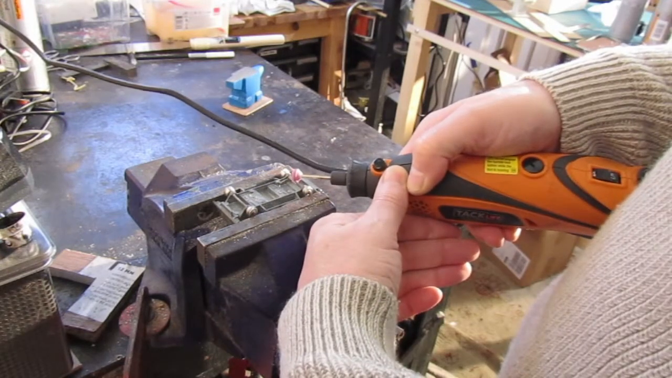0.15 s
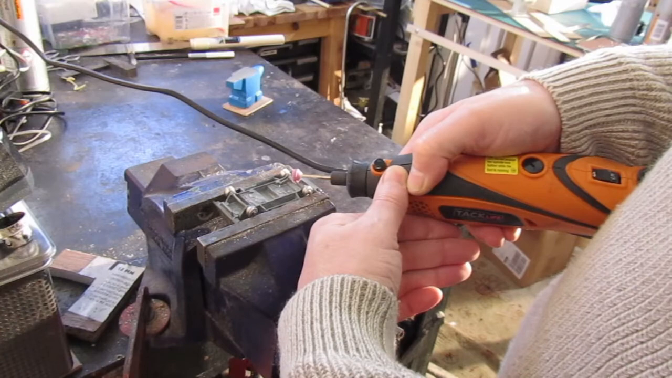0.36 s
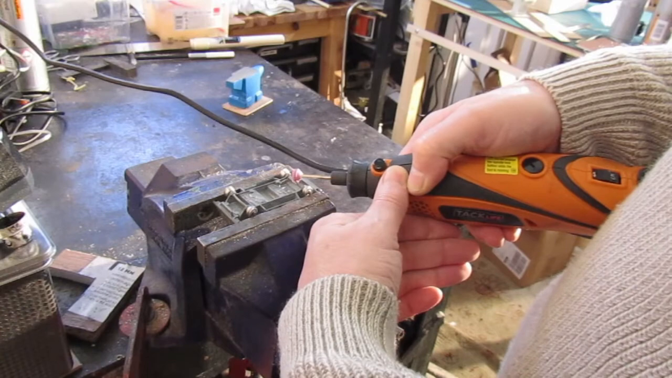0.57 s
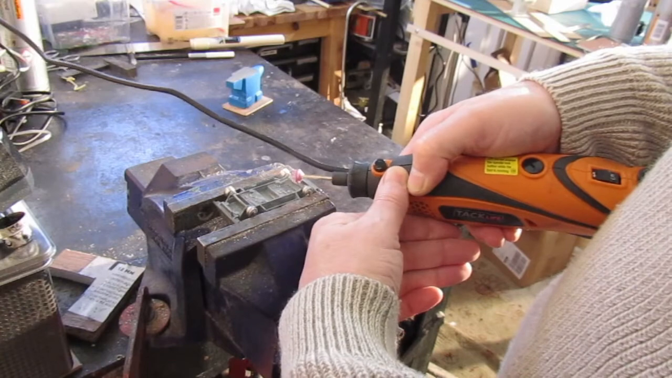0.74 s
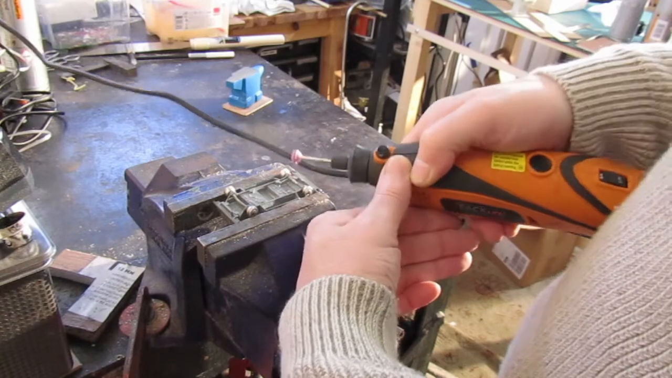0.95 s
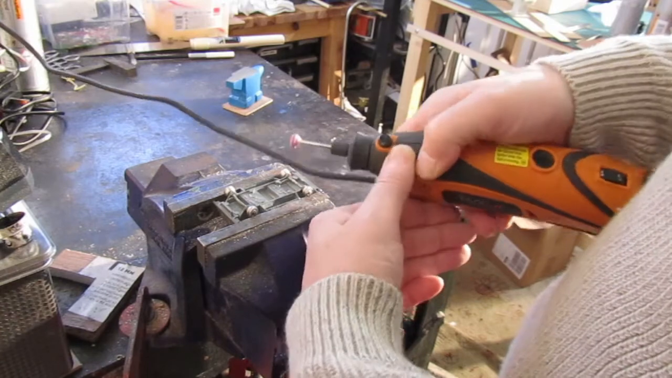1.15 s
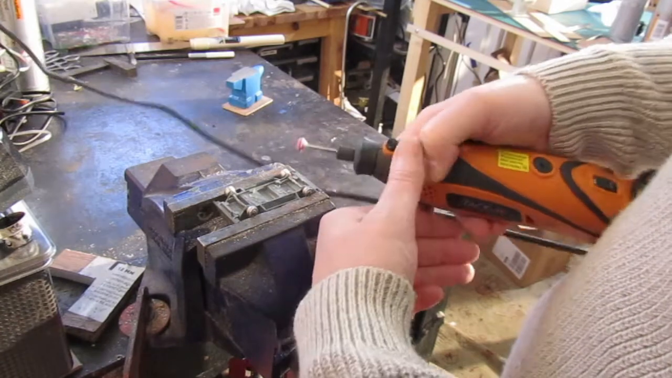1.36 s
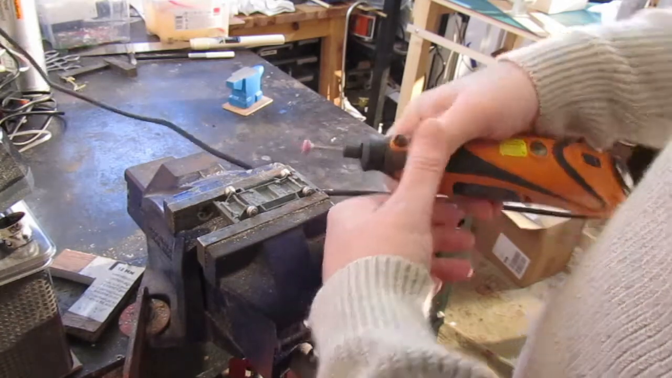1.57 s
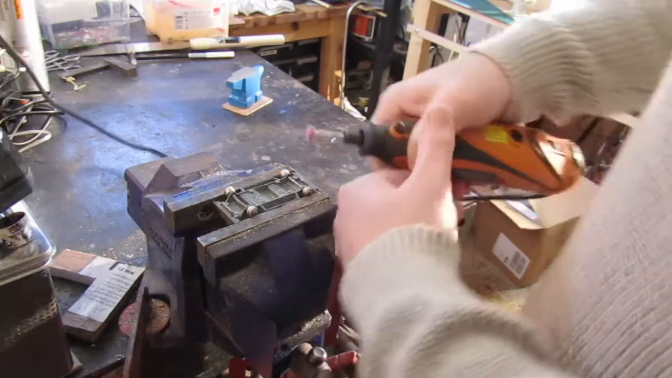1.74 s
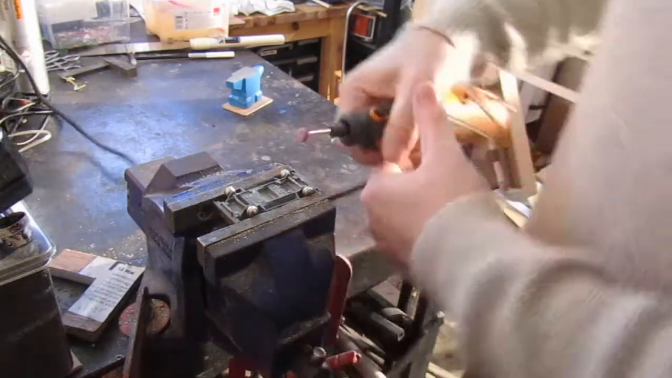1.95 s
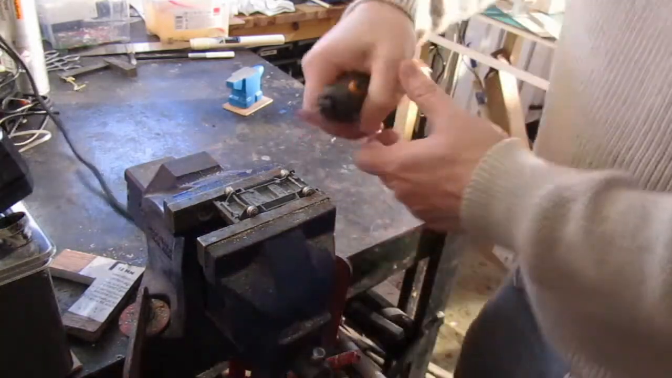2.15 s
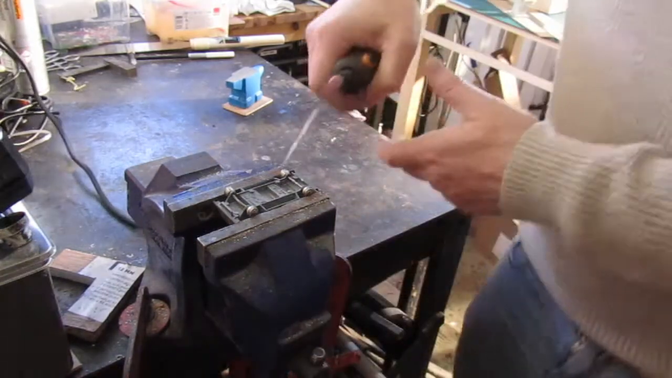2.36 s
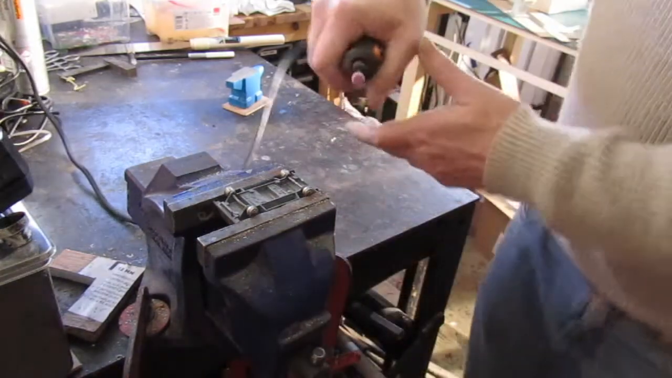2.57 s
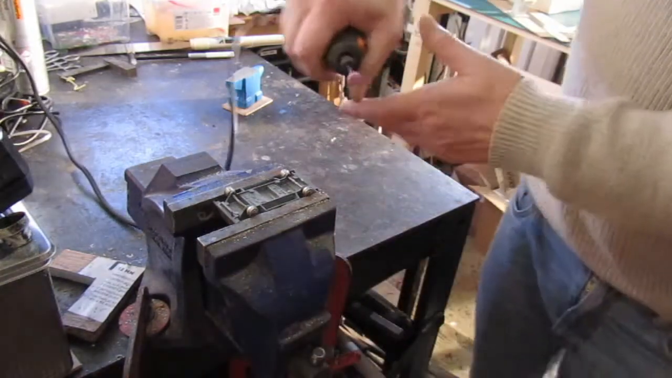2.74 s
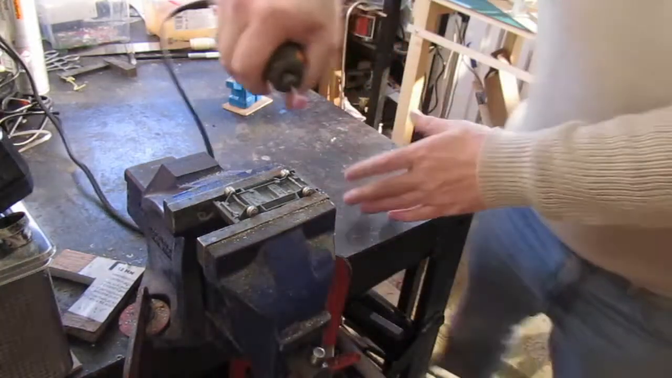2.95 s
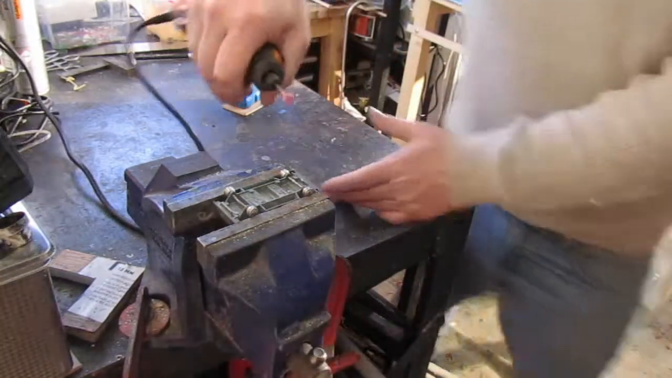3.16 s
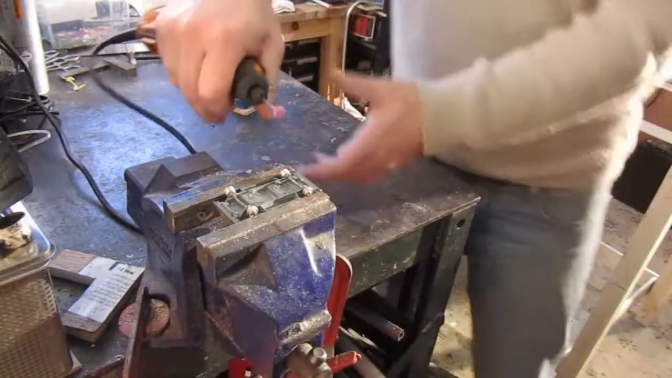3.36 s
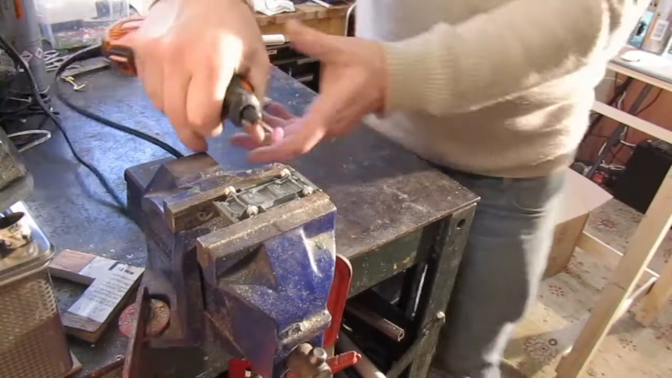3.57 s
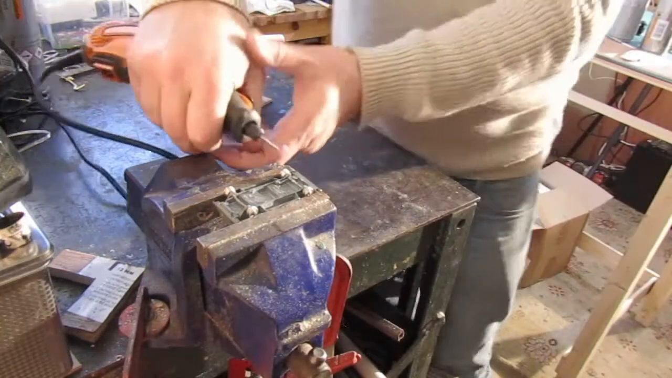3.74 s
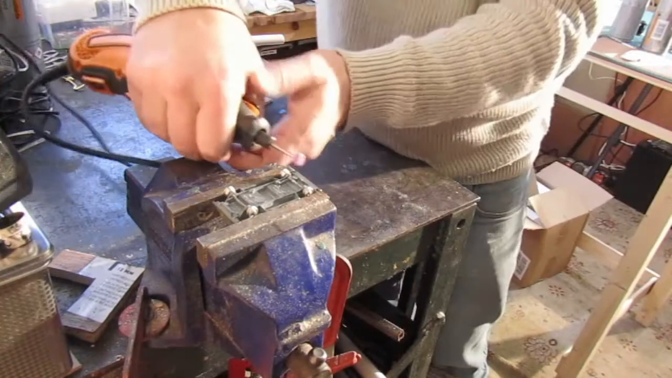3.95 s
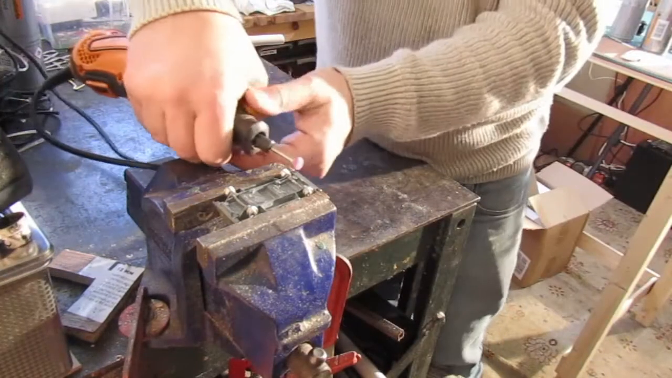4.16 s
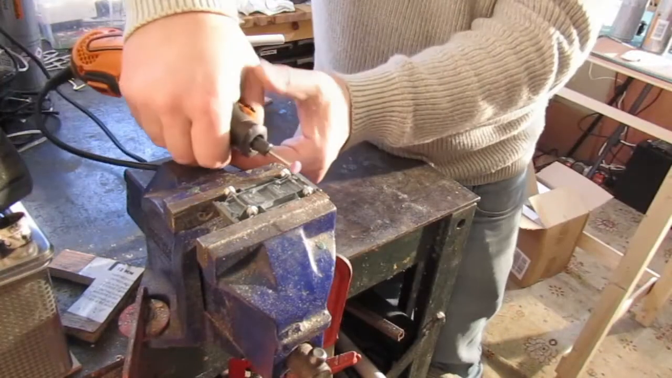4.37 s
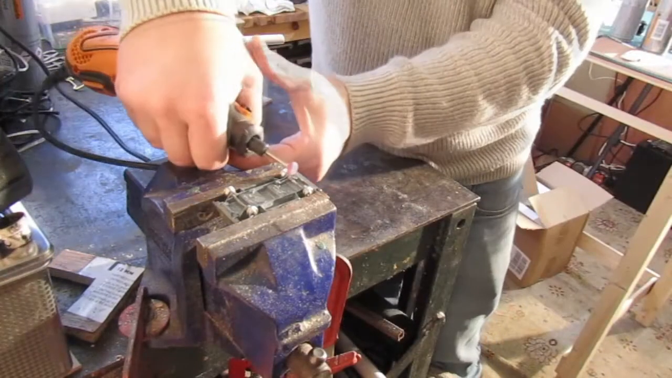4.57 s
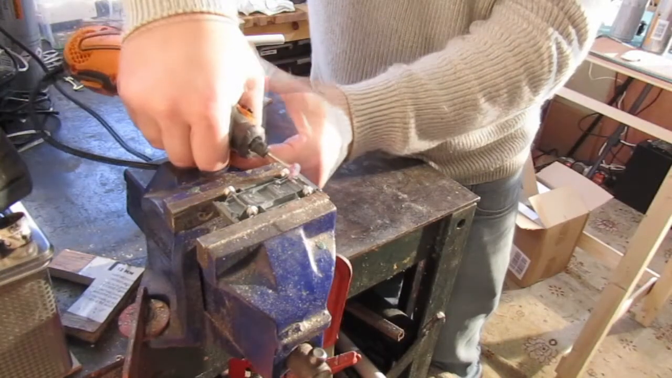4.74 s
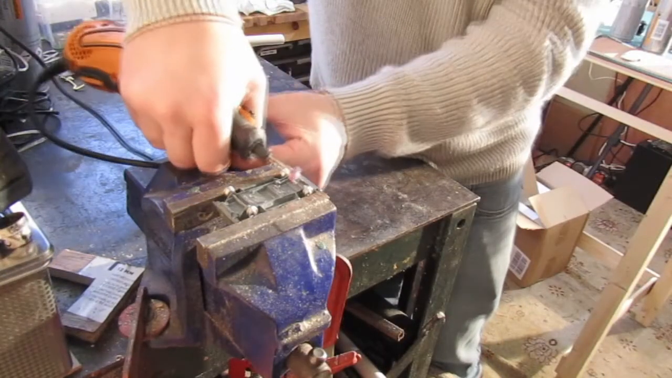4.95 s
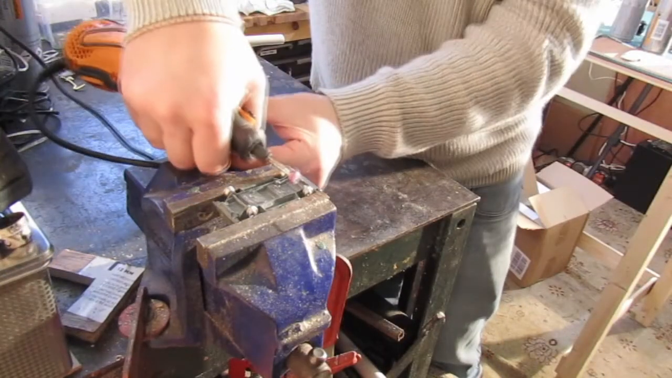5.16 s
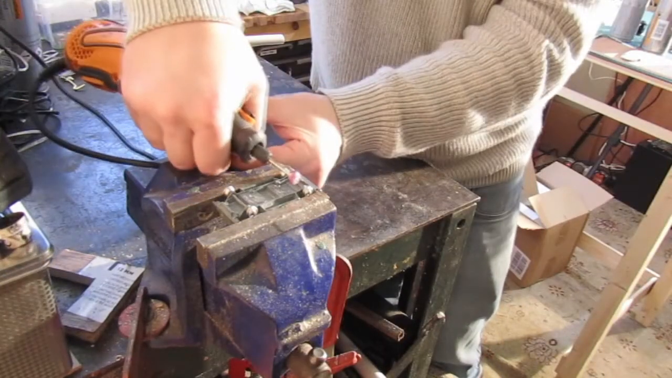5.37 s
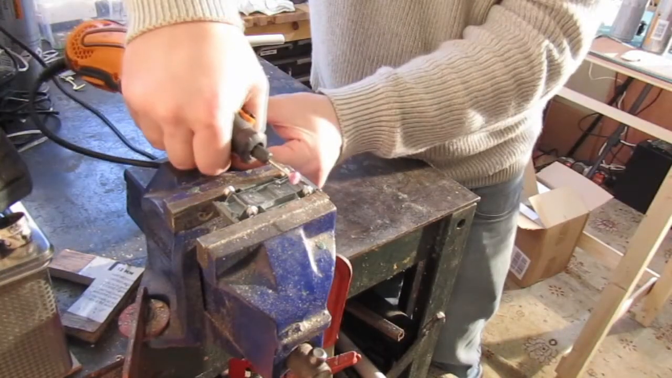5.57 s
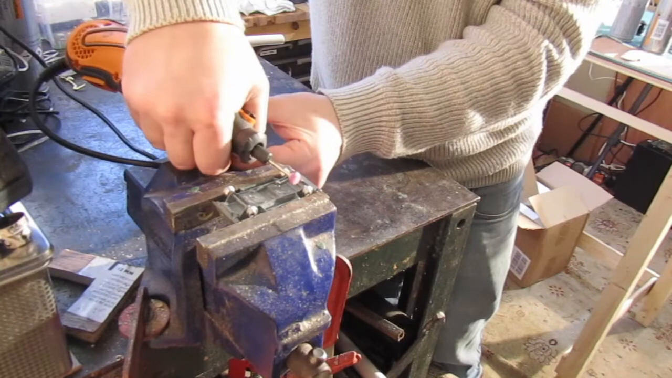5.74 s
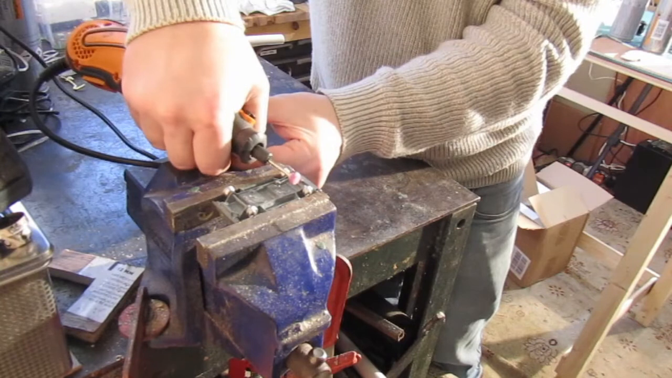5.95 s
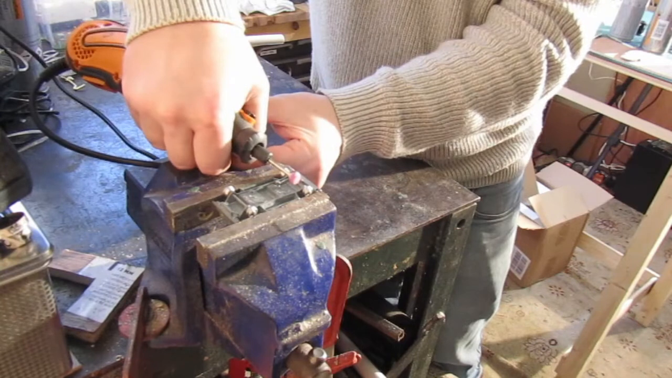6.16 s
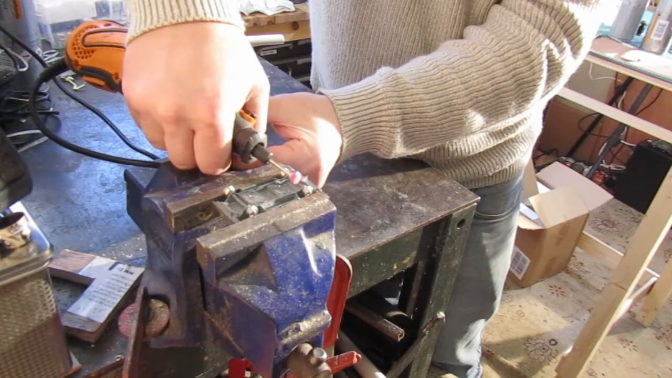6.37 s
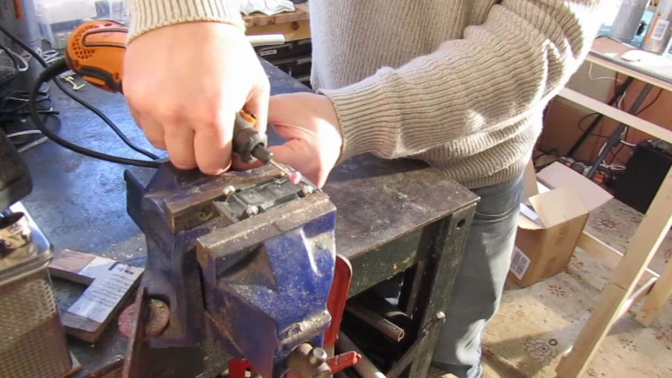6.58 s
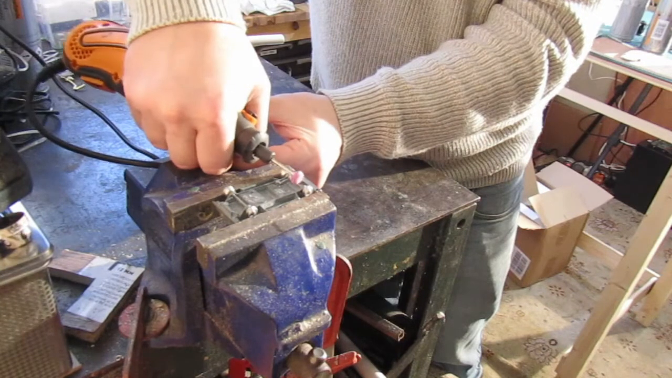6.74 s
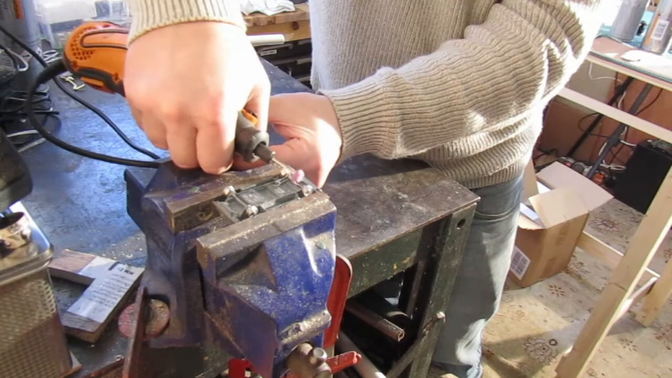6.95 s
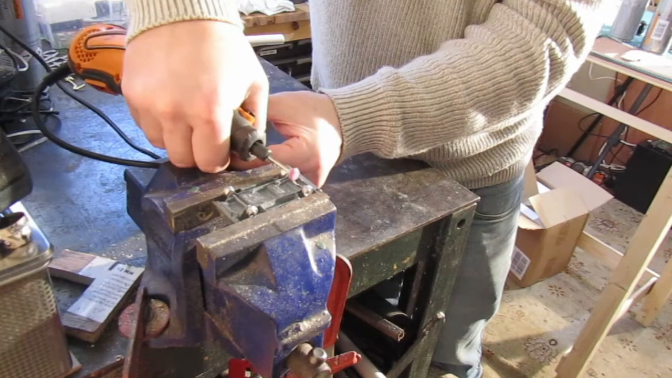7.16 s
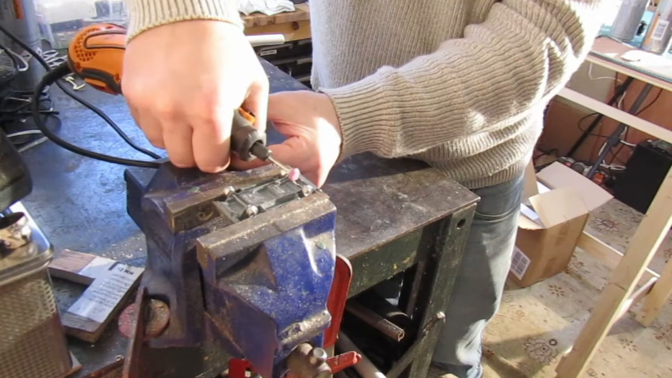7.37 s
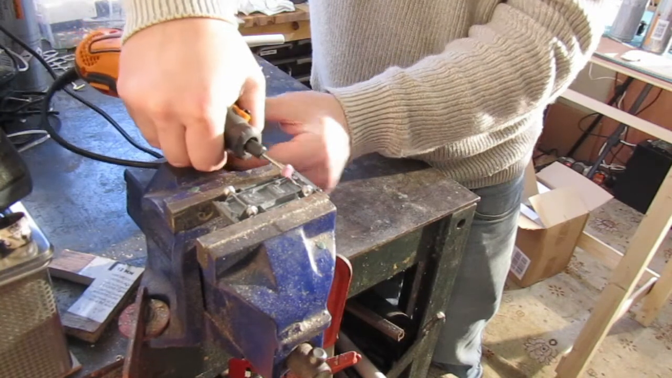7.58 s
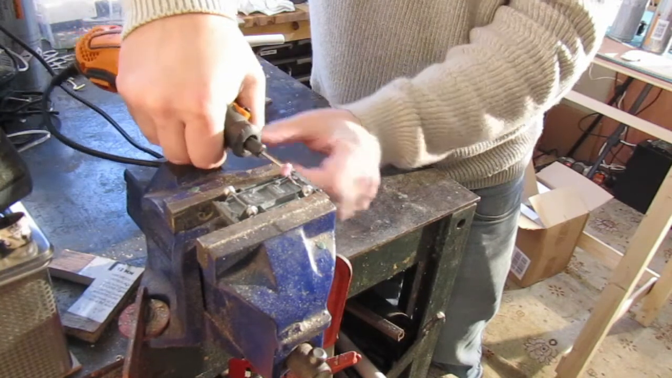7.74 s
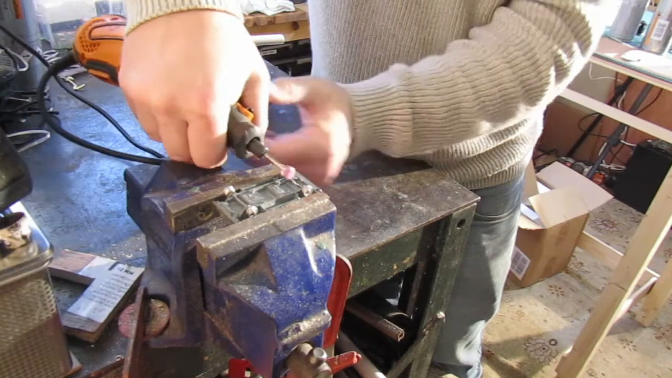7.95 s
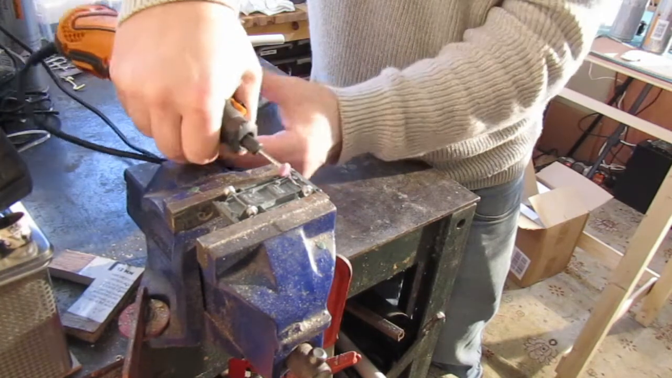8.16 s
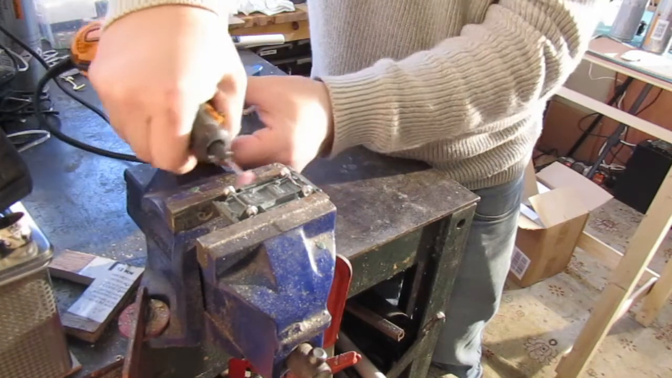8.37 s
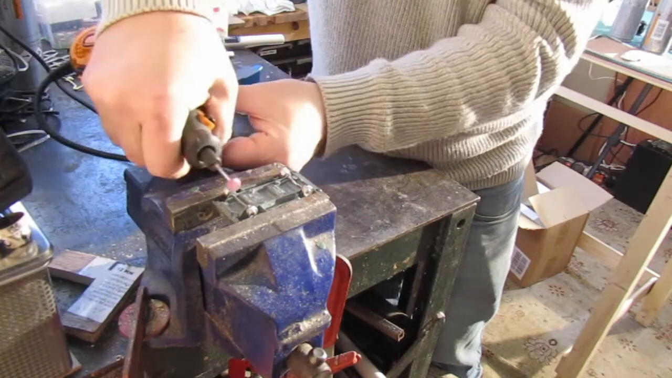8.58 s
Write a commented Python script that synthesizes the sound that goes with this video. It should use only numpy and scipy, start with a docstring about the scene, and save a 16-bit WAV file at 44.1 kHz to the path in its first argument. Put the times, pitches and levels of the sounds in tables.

```python
"""Rotary tool grinding a steel axle

Close up in a small workshop, a handheld tool whines. Its stone grinds an axle held in a vice, lifts off
so that the motor speeds up, and grinds again. Between the passes a shoe scuffs and something knocks
hollow wood. In the second pass the level dips briefly and the pitch jumps down. The left microphone
leads the right by a fraction of a millisecond."""
import sys
import numpy as np
from scipy import signal
from scipy.fft import rfft, irfft, next_fast_len
from scipy.io import wavfile
from scipy.ndimage import uniform_filter1d, map_coordinates

SR = 44100
rng = np.random.default_rng(int(sys.argv[2]) if len(sys.argv) > 2 else 0)


def file_out(sig):
    """Save sig as 16-bit WAV at sys.argv[1]."""
    # one column per channel
    cols = np.atleast_2d(sig).T
    # limit, then scale
    lim = np.clip(cols, -1, 1)
    pcm = np.round(lim * 32767).astype(np.int16)
    wavfile.write(sys.argv[1], SR, pcm)


N = 379701
TIME = np.arange(N) / SR
JUMP_S = 5.852  # the pitch drops and the level dips


def amp(db):
    return 10 ** (np.asarray(db) / 20)


def unit_rms(x):
    return x / np.sqrt(np.mean(x ** 2) + 1e-20)


def spectrum(points):
    """Gain against frequency through (f/Hz, level/dB) points on a log axis."""
    f, db = np.transpose(points)
    return lambda hz: amp(np.interp(np.log(hz + 1), np.log(f + 1), db))


def curves(rows):
    """One value per sample for each column after the time."""
    times, *columns = np.transpose(rows)
    return [np.interp(TIME, times, column) for column in columns]


def wobble(rate):
    """A smooth random curve, rate knots a second."""
    return map_coordinates(rng.standard_normal(int(N * rate / SR) + 4), [TIME * rate])


def filtered(x, response):
    """x through a complex frequency response."""
    size = next_fast_len(N + SR // 2)
    return irfft(rfft(x, size) * response(np.fft.rfftfreq(size, 1 / SR)), size)[..., :N]


def modes(table):
    """The response of (f/Hz, width/Hz, level/dB) resonances, alternating in sign."""
    return lambda f: sum((-1) ** k * amp(db) * 1j * f * width / (hz * hz - f * f + 1j * f * width)
                         for k, (hz, width, db) in enumerate(table))


def turning_noise(turns, depth_db, rough_db):
    """Noise that swells once a turn, each moment at a chance strength."""
    return rng.standard_normal(N) * amp(depth_db * np.cos(2 * np.pi * turns) + rough_db * wobble(300))


def shaft_speed(lag_s=.5, start_hz=319.6, after_jump_hz=339):
    """Turns a second: the rotor lags behind the speed that its load allows."""
    # allowed speed, low while the stone bites, high when it runs free: t/s, f/Hz
    allowed = [(0, 315), (.3, 310.8), (.5, 291.9), (.74, 255.5), (.81, 255.6), (.84, 426), (1.0, 428.6),
               (1.2, 405.7), (1.6, 414), (2.5, 421.3), (2.9, 420), (3.45, 414.7), (4.1, 417), (5.44, 419.5),
               (5.5, 402.3), (5.84, 379), (5.86, 334), (6.1, 320.4), (6.3, 303.2), (6.4, 329.2),
               (6.69, 335.8), (6.78, 400.3), (6.95, 433), (7.9, 426.4), (8.3, 425), (8.61, 420)]
    parts = np.split(curves(allowed)[0], [round(JUMP_S * SR)])
    pole = np.exp(-1 / (lag_s * SR))
    return np.concatenate([signal.lfilter([1 - pole], [1, -pole], part, zi=[pole * hz])[0]
                           for part, hz in zip(parts, (start_hz, after_jump_hz))])


def air_rush(turns):
    """Air and brushes hiss through the resonances of the tool's housing."""
    # spectrum of air and brushes: f/Hz, level/dB
    air = [(40, -21), (100, -16.5), (200, -11), (350, -3), (550, -4.5), (730, 0.5), (900, 3.5), (1010, -2),
           (1110, 5.5), (1500, 0), (2200, .5), (2900, 1), (4000, 1), (6000, 0), (8000, -1), (10000, 0),
           (12000, -5.5), (13500, -12.5), (14500, -15), (15300, -21)]
    # housing resonances: f/Hz, width/Hz, level/dB over the rush
    housing = [(468, 6.4, 7.5), (579, 7.6, 9), (785, 18, 2.5), (885, 56, 6.5), (5270, 1000, -1),
               (7250, 150, 1)]
    # shelf on the rush above 9 kHz: t/s, gain/dB
    shelf = [(.8, -14), (1.2, -9.5), (2.1, -3), (2.6, 2.5), (3.1, -3), (5.4, -3.5), (6.9, -6), (7.6, -4.5),
             (8.6, -6)]
    noise = turning_noise(turns, depth_db=.8, rough_db=.5)
    rush = filtered(noise, lambda hz: spectrum(air)(hz) * np.hypot(1, abs(modes(housing)(hz))))
    treble = filtered(rush, lambda hz: 1 / (1 + (9000 / (hz + 1)) ** 6))
    return unit_rms(rush + (amp(curves(shelf)[0]) - 1) * treble)


def motor_tones(turns, speed_hz, hum_db, twice_db, slots_db, full_speed_hz=418):
    """Shaft, bearings, commutator, fan and slots sing at multiples of the shaft speed."""
    # main tones (balls pass 2.553 times a turn and mix with the shaft):
    # multiple, index into family_db, level/dB within the family
    orders = [(1, 0, 0), (3, 0, -13), (5, 0, -25), (2, 1, 0), (4, 1, -9), (6, 1, -12), (2.553, 2, 0),
              (5.106, 2, -7), (7.77, 3, -6), (8, 3, -3), (8.23, 3, -6), (9, 3, -15), (24, 3, -19),
              (15, 6, 0), (15.77, 4, -11), (16, 4, 0), (16.23, 4, -10), (17, 5, -12), (18, 5, 0),
              (19, 5, -14)]
    # fainter bearing and fan tones: multiple, level/dB over the rush
    faint = [(3.553, -14), (4.553, -17), (5.106, -15), (5.447, -19), (6.106, -21), (6.659, -18),
             (7.106, -23), (8.659, -20), (9.659, -18), (10, -21), (11.765, -19), (12, -18), (12.212, -21),
             (12.765, -15.5), (13, -18), (13.212, -21), (13.765, -21), (14, -22), (20, -28), (22.31, -27),
             (24.23, -30), (27, -29), (28, -33), (31, -36), (32, -36)]
    # tone levels over the rush: t/s, commutator/dB, bearings/dB, fan/dB
    buzz = [(0, 13, -4, 15), (.08, 13, -4, 14), (.12, 13, -3, 2), (.42, 12, -2, 3), (.52, 5, -1, 10),
            (.62, 2, -3, 3), (.8, -12, -18, 3), (.88, -2, -5, -2), (1.0, 3, -2, -5), (1.15, -1, -3, -9),
            (1.5, -6.5, -10.5, -10), (1.9, -6.5, -18.5, -7), (3, -10.5, -9, -12), (3.6, -6, -11, -11),
            (4.1, -9, -19, -8.5), (4.8, -14, -20.5, -6), (5.4, -10.5, -21, -21), (6.27, -20, -20, -10),
            (6.35, 7, -22, 2), (6.58, 7, -15, 0), (6.75, -5, -2.5, -5), (7, -14, -4, -13),
            (7.3, -11, -14, -8), (7.9, -9, -11, -8), (8.6, -8, -10, -12)]
    # whistle at fifteen a turn: t/s, level/dB over the rush
    whistle = [(0, -5), (.08, 0), (.12, 9), (.29, 7), (.33, -5), (.4, 4), (.52, -8), (.8, -18), (1.35, -20),
               (1.5, -13), (2.1, -13), (2.7, -9), (3.2, -16), (3.7, -8), (4.4, -9), (5.2, -9), (5.5, -20),
               (7.1, -22), (7.3, -11), (7.5, -18), (7.8, -11), (8.3, -16), (8.61, -13)]
    # bench reflection, which cancels high tones now and then as the hand moves: t/s, strength 0-1
    bench = [(0, .5), (.9, .9), (3.9, .85), (4.1, .2), (5.2, .35), (6.8, .9), (7.8, .8), (8.1, .25),
             (8.61, .25)]
    commutator_db, bearing_db, fan_db = curves(buzz)
    reflection, = curves(bench)
    slow_db = 70 * np.log10(speed_hz / full_speed_hz)  # faint tones, fan and slots fade as it slows
    flutter_db = .48 * slow_db * wobble(35)
    family_db = [hum_db, twice_db + flutter_db, bearing_db, commutator_db,
                 fan_db + slow_db / 2, slots_db + slow_db / 2, curves(whistle)[0]]
    partials = [(multiple, db + family_db[family]) for multiple, family, db in orders]
    partials += [(multiple, db + slow_db) for multiple, db in faint]
    unsettled = np.clip(-slow_db / 1.5, .15, 1)  # below full speed the high tones break up
    tones = np.zeros(N)
    for multiple, db in partials:
        high = multiple > 9
        drift = .12 * wobble(30) * np.sqrt(multiple)  # play in the bearings blurs each tone
        waver_db = np.log(1 + multiple) * (.45 * wobble(5) + (.5 + .6 * unsettled * high) * wobble(18))
        echo = reflection * high
        interference = np.sqrt(1 + 2 * echo / (1 + echo ** 2) * np.cos(2.5 * wobble(3)))
        phase = 2 * np.pi * (multiple * turns + rng.random()) + drift
        tones += interference * amp(db + waver_db) * np.sin(phase)
    return np.sqrt(2) * tones


def stone_contact(skip_t60_s=.068):
    """How hard the stone bites: two long passes, and short skips that swell and die."""
    # pressure of the stone, one list a pass: t/s, level/dB
    passes = [
        [(0, -18.5), (.4, -17), (.7, -18), (.79, -17.5), (.87, -37.5), (.95, -44), (1.02, -44)],
        [(5.49, -27), (5.53, -20.5), (5.63, -25), (5.7, -22), (5.78, -18), (5.9, -18.5), (6.18, -19),
         (6.25, -22.5), (6.3, -20.5), (6.43, -24), (6.64, -22), (6.72, -23.5), (6.77, -34), (6.83, -26.5),
         (6.88, -39)],
    ]
    # skips on the steel: peak t/s, level/dB, rise/s
    skips = [(1.045, -24, .011), (.745, -17, .015), (.772, -14, .02), (.795, -17, .012), (.815, -21, .012),
             (6.207, -16, .008), (6.266, -15.5, .01), (5.468, -16, .01), (5.522, -17, .008),
             (5.552, -21, .008), (5.612, -24, .012), (5.715, -23, .012), (5.745, -21, .012),
             (5.775, -20, .015), (5.81, -22, .012), (6.11, -20, .01), (6.557, -21, .01), (6.575, -22, .01),
             (6.645, -22, .012), (6.714, -25, .012), (6.752, -26, .01), (6.78, -25, .008),
             (6.842, -22, .025)]
    bite = sum(amp(curves(rows)[0]) * (TIME >= rows[0][0]) * (TIME < rows[-1][0]) for rows in passes)
    for peak_s, db, rise_s in skips:
        age = TIME - peak_s
        rise = np.clip(1 + age / rise_s, 0, 1)
        bite = np.hypot(bite, rise * amp(db - 60 * np.maximum(age, 0) / skip_t60_s))
    return bite


def steel_ring(force, table, spot):
    """The modes answer with the strengths of the spot being ground; spots blend over 20 ms."""
    ring = np.zeros(N)
    for k in range(spot.max() + 1):
        share = uniform_filter1d(1. * (spot == k), size=SR // 50)
        response = modes([(hz, width, db[k]) for hz, width, *db in table])
        ring += share * unit_rms(filtered(force, response))
    return ring


def grinding(turns, spot_changes_s=(.765, 3, 6.03)):
    """Grains tear off under the uneven stone and shake the axle and the vice at their modes."""
    # spectrum of torn grains: f/Hz, level/dB
    torn_grains = [(40, -41), (100, -83), (200, -18.5), (350, -11), (600, -6), (900, -2), (1500, -1),
                   (2200, -2), (3200, -6), (4200, -2), (6000, -1), (8000, -1), (10000, -5.5),
                   (12000, -10.5), (13500, -8), (14500, -45), (15300, -50)]
    # axle modes: f/Hz, width/Hz, level/dB in each of the two passes
    axle_modes = [(1860, 60, 6, 9.5), (3550, 100, -10, -13), (3900, 120, -8, -12), (4050, 80, -14, -7),
                  (4740, 100, -1, -4), (5000, 150, -4, -8), (5800, 250, -9, -18), (6520, 90, -14, -5),
                  (7000, 200, -5, -5), (8600, 150, 0, -3), (8790, 100, -8, -4), (9150, 100, -8, -8),
                  (10300, 60, -3, -3), (11050, 150, -7, -7), (12310, 45, -1, -1), (12750, 120, -13, -13),
                  (13700, 70, -7, -7), (14250, 80, -8, -8), (14750, 100, -7, -7)]
    # vice modes: f/Hz, width/Hz, level/dB with the stone at each of four spots
    vice_modes = [(600, 45, 3, -8, -16, -16), (800, 50, -8, -12, -14, -14), (920, 80, -7, -9, -10, -10),
                  (1230, 50, -9, -8, 3, -10), (1310, 60, -10, -8, -8, -3), (1440, 110, -14, -2, -14, -12),
                  (1600, 80, -9, -6, -9, -7), (1920, 80, -12, -8, -6, -6), (2550, 130, -4, -6, -7, -7)]
    # how the stone sits: t/s, axle/dB and vice/dB over the grit, blows/dB over the grains
    seating = [(0, 2, -11, -4), (.45, 1.5, -10.5, -1.5), (.6, 1.5, -14, 6.5), (.76, 2, -11.5, 4.5),
               (.8, -1.5, -2, -8), (.9, 4.5, -9, -15), (1.1, 6, -21, -19), (5.45, 7, -0.5, -11),
               (5.65, 3.5, -3, -9), (5.85, 4, -1, -7), (6.0, 2.5, -1.5, 1), (6.07, 4, -8.5, -1),
               (6.3, 2.5, -7.5, -1), (6.4, 0, -13, 5), (6.55, 2.5, -8, -1), (6.9, 1, 2, -9)]
    axle_db, vice_db, blow_db = curves(seating)
    spot = np.searchsorted(spot_changes_s, TIME)
    bite = stone_contact()
    chatter = bite * amp(.8 * wobble(30) + 1.1 * wobble(80))
    grit = unit_rms(filtered(turning_noise(turns, depth_db=-1.5, rough_db=.54), spectrum(torn_grains)))
    # the stone's high spot strikes once a turn, a little early or late as it bounces
    strike_phase = 2 * np.pi * (turns + .015 * wobble(60))
    blows = sum(np.cos(k * strike_phase) for k in range(2, 7)) / 5
    grains = turning_noise(turns, depth_db=2, rough_db=-1)
    force = grains + amp(blow_db + 1.2 * wobble(14) + 1.8 * wobble(45)) * blows
    spurts = grains * amp(1.5 * wobble(55))
    axle = steel_ring(spurts, axle_modes, (spot > 1) * 1)
    vice = steel_ring(force, vice_modes, spot)
    vice *= amp(vice_db + wobble(12) + 2.2 * wobble(60))  # the grip shifts and the stone chatters
    overtones = sum(np.cos(k * strike_phase) for k in range(3, 6)) / 5
    airborne = amp(blow_db - 9 + 2 * wobble(15)) * overtones  # straight from the tool to the microphone
    lightness_db = np.clip(-20 - 20 * np.log10(bite + 1e-6), -5, 20)
    axle *= amp(axle_db + .21 * lightness_db + 1.5 * wobble(13))  # a light touch lets the axle ring
    return chatter * (grit + airborne + axle + vice)


def grain_ticks():
    """Single hard grains catch the steel with a sharp tick."""
    # catches: t/s, peak/dB
    catches = [(0.1894, 0), (5.4633, 5), (5.5206, -2), (5.5264, -1), (6.2057, -4), (6.2642, -10),
               (6.712, -14), (6.842, -15)]
    # broad ring of a tick: f/Hz, width/Hz, level/dB
    tick_modes = [(1900, 740, -30), (5000, 2700, 25), (9500, 4000, -4)]
    impulses = np.zeros(N)
    for start_s, db in catches:
        impulses[round(start_s * SR)] = amp(db)
    ticks = filtered(impulses, modes(tick_modes))
    return ticks / np.abs(ticks).max() * impulses.max()


def room_rumble(rush_db, thud_s, thud_t60_s=.39):
    """The room's low rumble swells with the rush, and the floor answers the knock with a thud."""
    # spectrum of the rumble: f/Hz, level/dB
    room = [(25, -20), (60, 4.5), (120, -45), (250, 13), (500, -33), (1000, -46)]
    age = TIME - thud_s
    thud = (age > 0) * amp(-34 - 60 * abs(age) / thud_t60_s)
    swell = amp(-50.5 + .98 * (rush_db - rush_db.max()) + 1.6 * wobble(2.45))
    return (thud + swell) * unit_rms(filtered(rng.standard_normal(N), spectrum(room)))


def shoe_scuff(peak_s=2.663, hold_s=.063, rise_db_per_s=129, fall_db_per_s=118):
    """A sole rubs the floor in one dull, rough swell of noise."""
    # spectrum of the sole: f/Hz, level/dB
    sole = [(40, -24), (90, -6.5), (170, 4), (300, 1.5), (700, -2.5), (1100, 0), (2000, -25)]
    age = TIME - peak_s
    shape_db = np.minimum(np.minimum(rise_db_per_s * age, 0), fall_db_per_s * (hold_s - age))
    envelope = amp(-32.5 + shape_db + 1.5 * wobble(65))
    return envelope * unit_rms(filtered(rng.standard_normal(N), spectrum(sole)))


def wood_knock(attack_s=.0006):
    """A few quick bounces ring a hollow wooden thing, too small to push deep bass."""
    # bounces: t/s, relative level/dB
    bounces = [(3.164, -9), (3.173, -8), (3.185, -10.5), (3.198, -11.5), (3.217, -22), (3.231, -27)]
    # modes of the wood: f/Hz, level/dB, t60/s
    wood = [(256.2, -4.5, 0.13), (328, -5, 0.11), (372, 8, 0.064), (456, 0.5, 0.021), (590, -14, 0.014),
            (874, -6.5, 0.072), (1370, 6, 0.005), (2046, -14.5, 0.11), (2900, -27, .02)]
    knocks, t = np.zeros(N), np.arange(SR // 4) / SR
    attack = 1 - np.exp(-t / attack_s)
    for start_s, bounce_db in bounces:
        ring = sum(amp(db + rng.normal(0, 1.5) - 60 * t / t60)
                   * np.sin(2 * np.pi * (hz * t + rng.random())) for hz, db, t60 in wood)
        knocks[round(start_s * SR):][:len(t)] += amp(bounce_db - 3) * ring * attack
    return filtered(knocks, lambda hz: 1 / np.sqrt(1 + (150 / (hz + 1)) ** 4))


def walls(x, t60_s):
    """The workshop walls return a short diffuse tail."""
    t = np.arange(SR // 3) / SR
    tail = rng.standard_normal(len(t)) * amp(-60 * t / t60_s)
    return signal.fftconvolve(x, tail / np.linalg.norm(tail))[:N]


def scene():
    """The tool, the knock and the floor from close by, with a little of the small room."""
    # the running tool: t/s, air rush/dB; over the rush: unbalance hum/dB, twice a turn/dB, slots/dB
    tool = [(0, -38.5, -7.5, 6, -10), (.74, -40, 1.5, 2, -12), (.8, -36, -8, -20, -13),
            (.86, -38.5, -12.5, -22, -14), (1.03, -38, -14, -19, -13), (1.1, -37.5, -15, -7, -13),
            (1.2, -36, -14, -6, -10), (1.45, -36, -5.5, -4, -13), (1.62, -35.5, -6, -12, -1),
            (1.8, -35, -3.5, -14, -9), (2.4, -34.5, -9.5, -13.5, -8), (2.7, -34, -5.5, -6, -5),
            (3.3, -28.5, -8.5, -6, -2), (3.9, -27.5, -2, -14.5, -10), (4.5, -23.5, -3, -4.5, -2),
            (5.455, -21, -1.5, -4, -36), (5.485, -24, -9, -6, -16), (5.6, -27, -6.5, -15, -2),
            (6.2, -41, 3.5, 2, -16), (6.4, -34.5, -13.5, -9, -9), (6.9, -39, -12, -21, -9),
            (7.25, -36.5, -4, -6.5, -12), (7.8, -34, -2, -9.5, -3), (8.05, -33.5, -4, 3, -10.5),
            (8.61, -29.5, -8, -4.5, 4)]
    rush_db, hum_db, twice_db, slots_db = curves(tool)
    speed_hz = shaft_speed()
    turns = np.cumsum(speed_hz) / SR
    rush = air_rush(turns)
    tones = motor_tones(turns, speed_hz, hum_db, twice_db, slots_db)
    motor = amp(rush_db) * (amp(2 + 1.23 * wobble(7)) * rush + tones)
    near = motor + grinding(turns) + grain_ticks() + wood_knock() + shoe_scuff()
    near += room_rumble(rush_db, thud_s=3.164)
    return np.tile(near + amp(-18) * walls(near, t60_s=.25), (2, 1))


def record(dry, lag_samples=(8.3, 7.33), dip_s=.0091, top_hz=15655):
    """A stereo pair, the right side late; at the pitch jump the level dips and the lag shortens."""
    # microphone response: f/Hz, gain/dB
    microphone = [(20, 2), (150, -5), (300, -4), (13500, -2), (14600, -34), (15200, -2), (16000, -50)]
    before, after = (filtered(dry[1], lambda hz: np.exp(-2j * np.pi * hz * lag / SR))
                     for lag in lag_samples)
    pair = np.array([dry[0], np.where(TIME < JUMP_S, before, after)])
    pair = pair / (1 + abs(pair / .95) ** 6) ** (1 / 6)  # the input rounds off the highest peaks
    dip = np.clip(abs(TIME - JUMP_S) / dip_s, .05, 1)
    return filtered(pair * dip, lambda hz: spectrum(microphone)(hz) * (hz < top_hz))


dry = scene()
out = record(dry)
file_out(out)
```